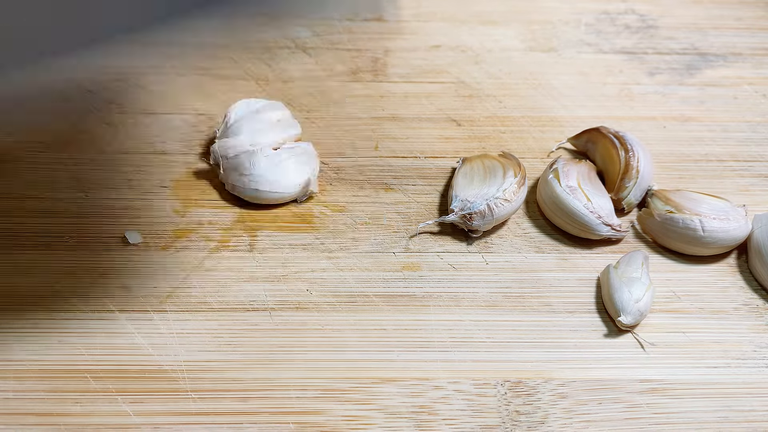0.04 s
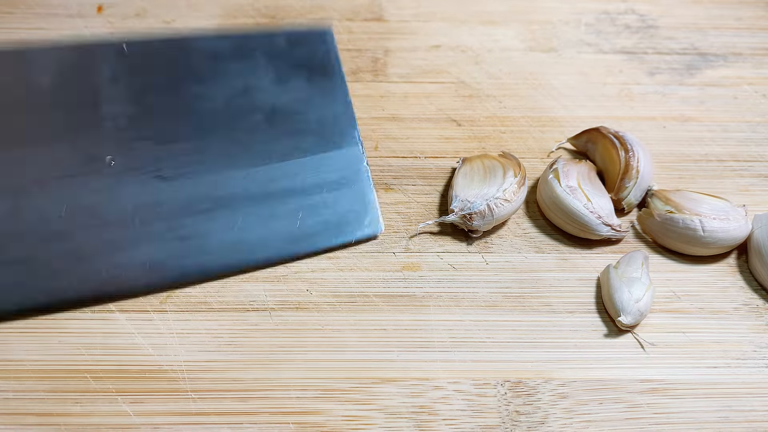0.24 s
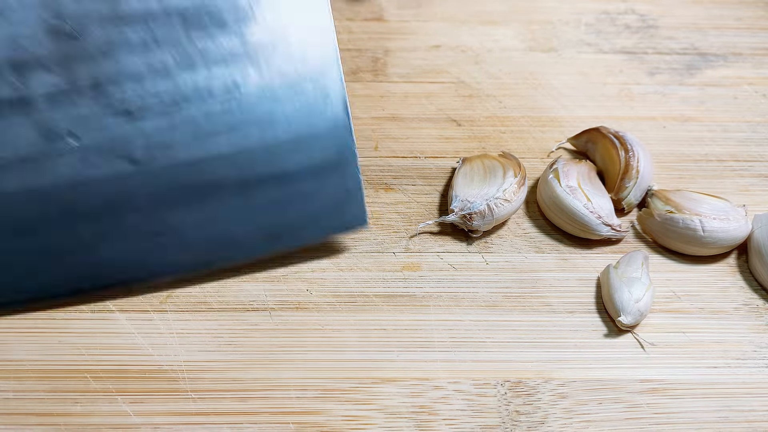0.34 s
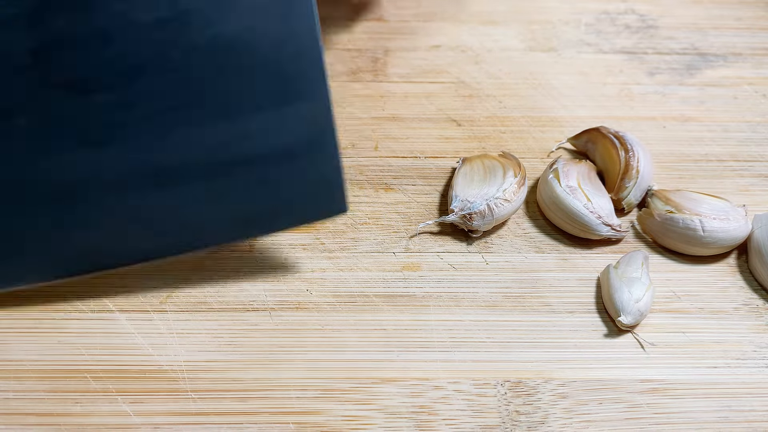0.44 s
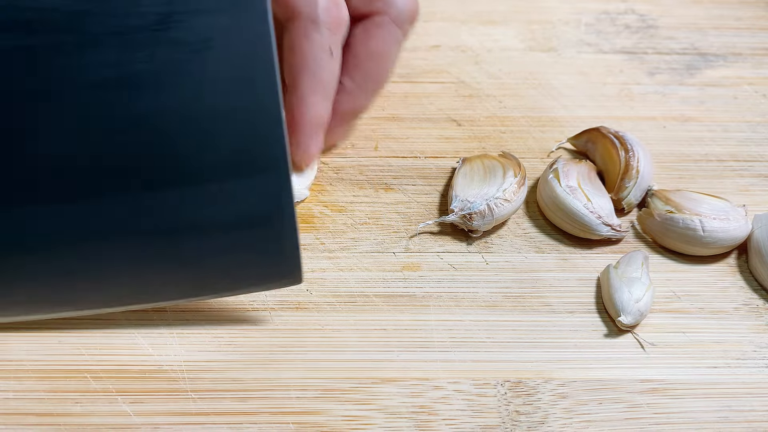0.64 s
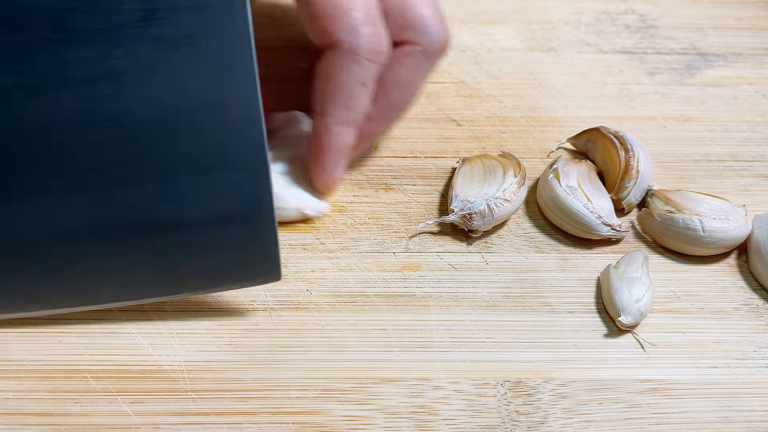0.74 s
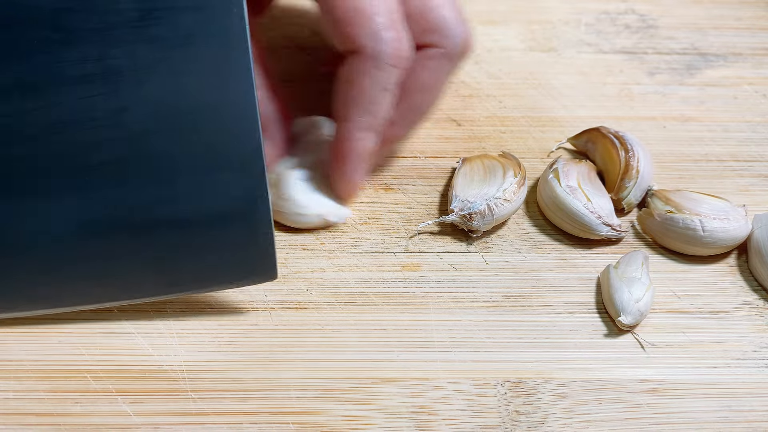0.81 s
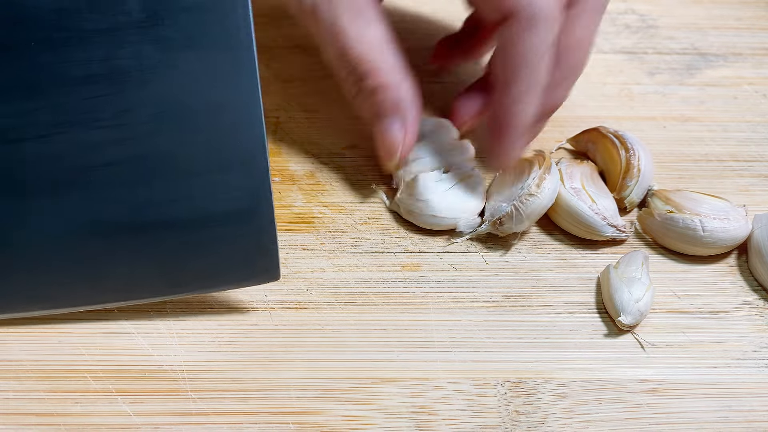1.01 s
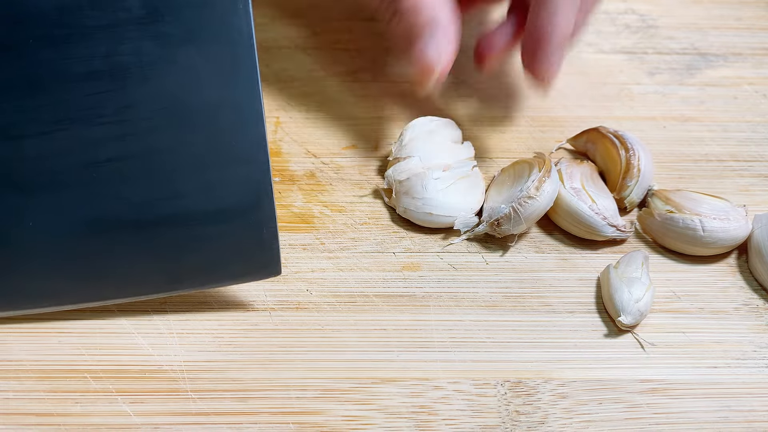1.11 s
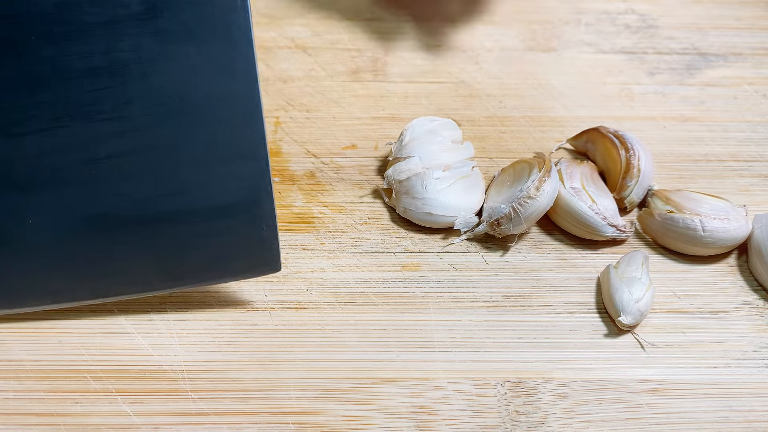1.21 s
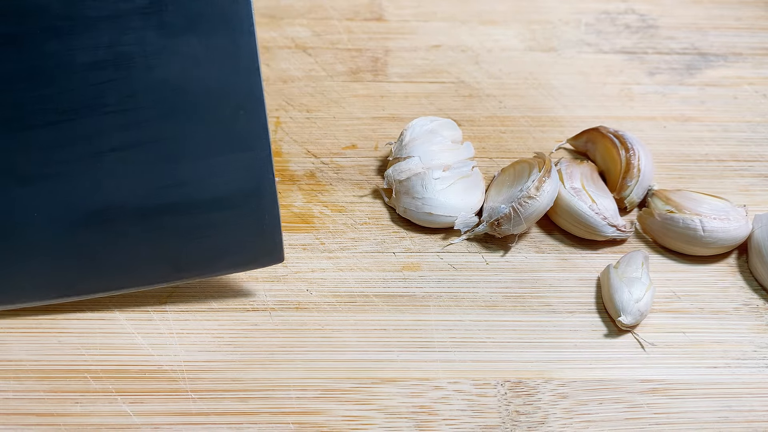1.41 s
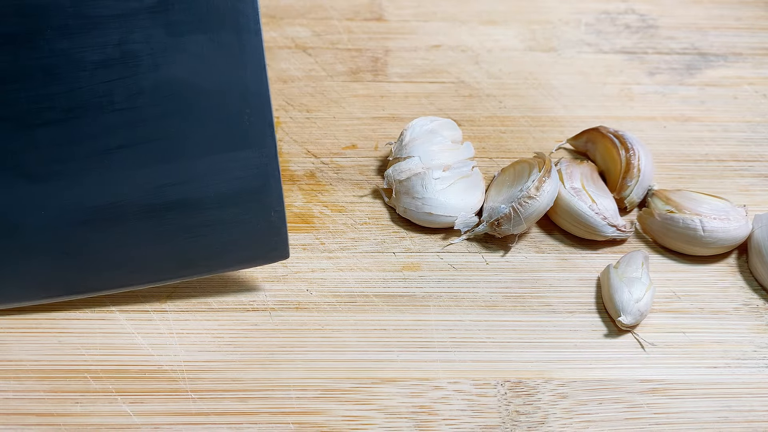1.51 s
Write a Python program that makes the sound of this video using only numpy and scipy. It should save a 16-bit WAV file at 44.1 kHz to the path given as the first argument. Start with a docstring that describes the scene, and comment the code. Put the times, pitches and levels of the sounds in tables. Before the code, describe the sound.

A heavy steel blade smacks flat onto garlic on wood, then knocks softly and faint rubbing follows

```python
"""The flat of a cleaver smacks a garlic clove on a wooden board, rocks down twice more and is drawn aside. Each
contact is a noise crack, damped modes of steel and wood, and a clatter; a resonant noise swells into the smack.
The crushed clove slides over the wood as patchy noise with thin whistles; small taps are pitched puffs. The
worktop drones as resonant noise, in a quiet kitchen heard close up by two microphone ports."""
import sys
import numpy as np
from scipy import signal
from scipy.fft import rfft, irfft, next_fast_len
from scipy.io import wavfile
from scipy.ndimage import uniform_filter1d

SR = 44100
rng = np.random.default_rng(int(sys.argv[2]) if len(sys.argv) > 2 else 0)


def digitize_waveform(pressure):
    """Quantize a signal to 16-bit integers and store it at the path in sys.argv[1].

    Rows of a 2-D input are taken as channels; values are limited to [-1, 1].
    """
    field = np.atleast_2d(pressure).T
    bounded = np.clip(field, -1, 1)
    quanta = np.round(bounded * 32767).astype(np.int16)
    wavfile.write(sys.argv[1], SR, quanta)


N = 68355
T = np.arange(N) / SR  # time [s]

# Kitchen hush: (frequency [Hz], density [dB per Hz])
HUSH_SPECTRUM = [(15, -58.5), (25, -34), (53, -0.5), (123, -4.5), (263, -34.5), (301, -5), (354, -33.5),
                 (394, -28.5), (1650, -24), (1840, -35), (16000, -62.5)]
# Likeness of the two ports in hush and drone: (frequency [Hz], correlation [-1 to 1])
PORT_LIKENESS = [(60, 0.95), (240, 0.82), (950, -0.018), (3770, -0.11), (15000, 0.018)]
# Worktop drone before and after the smack: (time [s], low level [dB], upper level [dB])
DRONE_LEVELS = [
    [(0.0, -38, -47.5), (0.012, -43, -43.5), (0.034, -42.5, -57), (0.062, -46.5, -49.5),
     (0.078, -83.5, -53), (0.1, -50, -47.5)],
    [(0.18, -40, -29.5), (0.266, -51, -41), (0.34, -39, -41.5), (0.374, -34, -45), (0.462, -56.5, -46.5),
     (0.542, -57, -56.5), (0.63, -49, -61.5), (0.736, -61, -65), (0.92, -59, -63.5), (1.194, -71.5, -74),
     (1.55, -70, -68)],
]
# Low and upper worktop resonances: (frequency [Hz], width [Hz], level [dB])
WORKTOP_LOW_MODES = [(68.5, 7.5, -8), (124, 9.9, 2.14)]
WORKTOP_UPPER_MODES = [(204.7, 30, 4.5), (257, 91, -7.5), (430, 60, -11.5), (580, 17, -18)]

# Contacts of the smack, then of the rocking blade:
# (time [s], crack level [dB], steel level [dB], wood level [dB], clatter level [dB])
SMACK_CONTACTS = [(.1250, -16, -30, -34, -45), (.1263, -7, -12, -26, -40), (.1272, -11, -24, -26, -40),
                  (.1291, -26, -30, -5, -29)]
ROCK_CONTACTS = [(.3099, -36.5, -32, -48, -43.5), (.3118, -37, -50.5, -14, -40),
                 (.3263, -35.5, -44.5, -18, -43.5)]
# Modes of the blade, of the board smacked and of the board knocked by the rocking blade:
# (frequency [Hz], level [dB], decay by 60 dB [s], left over right [dB])
STEEL_MODES = [(715, -14, .07, 0), (860, -14, .08, 0), (1044, -17, .15, 0), (1480, -2, .025, 0),
               (1890, -2, .13, 3), (2164, -18, .15, 0), (2358, -19, .25, 0), (2480, -12, .04, 0),
               (2640, -12, .16, 3), (2900, -3, .016, 0), (3330, -22, .25, 0), (3460, -16, .14, 0),
               (3560, 7, .011, 0), (4400, -14, .02, 0), (6000, -14, .03, 0), (7320, -24, .08, 0)]
BOARD_MODES = [(222, -1, .06, -1.5), (68, -26, .15, -1.5), (340, -6, .02, 0), (900, -20, .015, 0),
               (490, -10, .025, -4), (126, -17, .2, -1.5), (680, -18, .015, 0)]
KNOCK_MODES = [(125, -18, .15, 0), (425, -15, .07, 0), (620, -17, .03, 0), (830, -14, .03, 0),
               (1400, 0, .013, 0), (1620, -4, .013, 0), (1870, -14, .06, 0), (2300, -13, .015, 0),
               (2710, -18, .08, 0), (2870, -8, .01, 0), (4050, -18, .01, 0)]
# Crack of a contact: (frequency [Hz], density [dB per Hz])
CRACK_SPECTRUM = [(150, -39.5), (400, -21), (1400, 7), (2500, 7), (3600, 6), (4200, -4), (7500, -1),
                  (10000, -11), (13000, -8), (16000, -12)]
# Dense clatter of board and blade after a contact: (frequency [Hz], density [dB per Hz])
CLATTER_SPECTRUM = [(180, -36.5), (300, -9), (455, -1.5), (634, -11.5), (961, -5), (1320, -11.5),
                    (1840, -6), (3400, -15.5), (7950, -24.5), (8790, -72), (10900, -41.5), (12500, -30),
                    (16000, -80.5)]
# Resonances of the swell that leads into the smack: (frequency [Hz], width [Hz], level [dB])
LEAD_IN_MODES = [(1850, 83, 8), (2600, 200, 7), (3970, 800, -8), (6000, 670, -9.5)]

# Each port's own share of room and clatter: (frequency [Hz], own over shared [ratio])
OWN_SHARE = [(100, .3), (500, 2.1), (3000, 11), (7000, 6.3), (8500, 0.23), (16000, 0.13)]
# Decay of the room: (frequency [Hz], decay by 60 dB [s])
ROOM_DECAY = [(100, 0.55), (300, 0.071), (1000, 0.38), (3000, 0.45), (8000, 0.29), (14000, 0.043)]
# Colour of the room: (frequency [Hz], level [dB])
ROOM_COLOUR = [(100, -17.5), (300, -1.5), (1000, -1.1), (2500, -3), (5000, -3.5), (8000, 5.5),
               (12000, -3.5), (16000, -15.5)]

# Strokes of steel, clove and finger, before RUB_DB: (time [s], level [dB])
STROKES = [
    [(0.34, -64.5), (0.384, -66.5), (0.444, -65), (0.472, -85), (0.55, -86.5), (0.62, -94)],
    [(0.62, -85.5), (0.742, -62), (0.872, -61.5), (0.94, -66), (0.964, -61), (1.038, -63), (1.055, -61.5),
     (1.075, -81), (1.168, -108), (1.2, -95.5)],
    [(1.45, -97.5), (1.455, -77.5), (1.492, -85), (1.532, -76.5), (1.542, -66), (1.55, -90)],
]
# Friction on wood: (frequency [Hz], density [dB per Hz])
RUB_SPECTRUM = [(200, -18.5), (600, -14.5), (1100, -4.5), (1700, -10.5), (2250, -1.5), (2600, 1),
                (3000, -4), (4000, -6), (7000, -1.5), (10000, -0.5), (13000, -4), (15000, 5.5),
                (16000, -12.5)]
# Thin whistles while the steel drags, and a faint later one:
# (middle [s], half length [s], pitch [Hz], width [Hz], level [dB])
WHISTLES = [(.42, .05, 5150, 120, -66), (.43, .05, 6300, 100, -66), (.44, .04, 7350, 25, -61),
            (1.255, .05, 5550, 250, -85)]
# Fingers and skin ticking, far taps: (time [s], peak level [dB], pitch [Hz], decay by 60 dB [s])
TAPS = [(.388, -40, 560, .04), (.655, -62, 3000, .008), (.6875, -51, 9000, .004), (.706, -54, 7000, .008),
        (.735, -45, 5000, .01), (.781, -46, 11000, .004), (.824, -58, 1050, .03), (.835, -55, 2600, .03),
        (.856, -59, 600, .025), (.858, -58, 2700, .015), (.872, -58, 1050, .02), (.893, -59, 1250, .015),
        (.922, -56, 700, .03), (.948, -59, 1150, .02), (.962, -55, 2600, .03), (1.001, -53, 3500, .01),
        (1.044, -57, 1300, .025), (1.046, -56, 6000, .015), (1.4535, -54, 1500, .006),
        (1.4575, -50, 800, .015), (1.458, -57, 3300, .05), (1.5135, -57, 850, .015)]
# Phase between the microphone ports: (frequency [Hz], left lead [radians])
PORT_LEAD = [(300, 0.05), (700, -1.4), (1300, -.9), (2000, -2.1), (2800, -1.9), (4500, -1.3), (6500, -.4),
             (8400, 3.1), (10100, 3.2), (11000, 6.3), (13600, 6.4), (14500, 9.4), (16000, 9.4)]

AIR_DB = -63
EARLIER_DB, EARLIER_T60 = -71.5, .34  # level at the start, decay by 60 dB [s]
CRACK_T60 = .0055  # s
ATTACK_S = .00011  # onset of every mode
STEEL_SCATTER_DB, WOOD_SCATTER_DB = 1.5, .7  # random spread of mode levels
CLATTER_T60, CLATTER_RISE_S = .25, .0013  # s
LEAD_START_S, LEAD_END_S, LEAD_RISE_S = .105, .1255, .01  # swell starts, swell ends, rise time of the swell
LEAD_DB, LEAD_PAN_DB = -19, 11  # left level, left over right
SLAP_S, SLAP_LEN_S, SLAP_DB = .1287, .0003, -6
ROOM_DB = -13  # gain of the room's answer
GRAINS_PER_S, GRAIN_SPREAD_DB = 700, 4
PATCHY_DB, RUB_DB = 2.8, 3  # unevenness of the hiss, gain over the strokes
TAP_WIDTH = .35  # resonance width over pitch
MIC_LOW_HZ, TOP_HZ = 30, 16200  # bass corner, band limit


def amp(db):
    """dB to gain."""
    return 10 ** (np.asarray(db) / 20)


def unit(x):
    """Scaled to rms 1."""
    return x / np.sqrt(np.mean(x ** 2) + 1e-20)


def along(points, hz):
    """Values of a (Hz, value) table, read along a log frequency axis."""
    f, value = np.transpose(points)
    return np.interp(np.log(hz + 1), np.log(f + 1), value)


def filtered(x, response):
    """x times a complex response of frequency."""
    m = next_fast_len(N + SR // 2)
    return irfft(rfft(x, m) * response(np.fft.rfftfreq(m, 1 / SR)), m)[..., :N]


def peaks(table):
    """Response of a set of resonances of alternating sign."""
    def response(f):
        return sum((-1) ** k * amp(db) * 1j * f * width / (c * c - f * f + 1j * f * width)
                   for k, (c, width, db) in enumerate(table))
    return response


def spread(response):
    """Stereo noise of rms 1, alike in the bass: mid and side shares set the likeness."""
    def shares(hz):
        turn = np.arccos(np.clip(along(PORT_LIKENESS, hz), -1, 1)) / 2
        return response(hz) * [np.cos(turn), np.sin(turn)]
    mid, side = filtered(rng.standard_normal((2, N)), shares)
    return unit(np.array([mid + side, mid - side]))


def ring(modes, t, scatter_db):
    """Damped modes of alternating sign, a slightly new balance for each contact."""
    total = 0
    for k, (hz, db, t60, pan) in enumerate(modes):
        port_db = np.array([[pan], [-pan]]) / 2
        level_db = db + scatter_db * rng.standard_normal() + port_db - 60 * t / t60
        total = total + (-1) ** k * amp(level_db) * np.sin(2 * np.pi * hz * t)
    return (1 - np.exp(-t / ATTACK_S)) * total


def air():
    """Kitchen hush as steady shaped noise, and the dying tail of an earlier blow."""
    hush = amp(AIR_DB) * spread(lambda hz: amp(along(HUSH_SPECTRUM, hz)))
    earlier = spread(lambda hz: amp(along(CRACK_SPECTRUM, hz)))
    return hush + amp(EARLIER_DB - 60 * T / EARLIER_T60) * earlier


def drone():
    """The worktop trembles: noise through its low and upper resonances, each with its own level curve."""
    s, low_db, upper_db = np.vstack(DRONE_LEVELS).T
    low = amp(np.interp(T, s, low_db)) * spread(peaks(WORKTOP_LOW_MODES))
    upper = amp(np.interp(T, s, upper_db)) * spread(peaks(WORKTOP_UPPER_MODES))
    return low + upper


def clatter_noise():
    """Dense clatter as noise, partly shared and partly each port's own."""
    def tone(hz):
        return amp(along(CLATTER_SPECTRUM, hz)) / np.sqrt(1 + along(OWN_SHARE, hz) ** 2)
    shared = filtered(rng.standard_normal(N), tone)
    own = filtered(rng.standard_normal((2, N)), lambda hz: tone(hz) * along(OWN_SHARE, hz))
    return unit(shared + own)


def lead_in():
    """A resonant noise swells and leads into the smack, stopping just before it."""
    swell = np.exp(np.minimum(T - LEAD_END_S, 0) / LEAD_RISE_S) * (T < LEAD_END_S) * (T > LEAD_START_S)
    lead_noise = unit(filtered(rng.standard_normal(N), peaks(LEAD_IN_MODES))) * swell
    return lead_noise * amp(LEAD_DB + np.array([[0], [-LEAD_PAN_DB]]))


def slap():
    """Air squeezed from under the blade gives one smooth pressure pulse."""
    return amp(SLAP_DB) * np.exp(-((T - SLAP_S) / SLAP_LEN_S) ** 2)


def cleaver():
    """Each contact cracks, rings the steel, sounds the wood and leaves a clatter."""
    out, t = np.zeros((2, 2 * N)), T[:SR // 2]
    crack_noise = unit(filtered(rng.standard_normal(N), lambda hz: amp(along(CRACK_SPECTRUM, hz))))
    clatter = clatter_noise()
    clatter_shape = amp(-60 * t / CLATTER_T60) * (1 - np.exp(-t / CLATTER_RISE_S))
    for contacts, wood_modes in ((SMACK_CONTACTS, BOARD_MODES), (ROCK_CONTACTS, KNOCK_MODES)):
        for s, crack_db, steel_db, wood_db, clatter_db in contacts:
            i = round(s * SR)
            span = slice(i, i + len(t))
            out[:, span] += amp(crack_db - 60 * t / CRACK_T60) * crack_noise[span]
            out[:, span] += amp(steel_db) * ring(STEEL_MODES, t, STEEL_SCATTER_DB)
            out[:, span] += amp(clatter_db) * clatter_shape * clatter[:, span]
            out[:, span] -= amp(wood_db) * ring(wood_modes, t, WOOD_SCATTER_DB)
    return out[:, :N]


def room(x):
    """Each frequency of the kitchen's answer dies at its own speed; part differs from port to port."""
    hz, t, z = signal.stft(rng.standard_normal((3, SR)), SR, nperseg=256)
    own = along(OWN_SHARE, hz)[:, None]
    z = (z[:1] + own * z[1:]) / np.sqrt(1 + own ** 2)
    decay = amp(-60 * t / along(ROOM_DECAY, hz)[:, None])
    tail = signal.istft(z * decay, SR, nperseg=256)[1]
    delayed = np.pad(x, ((0, 0), (130, 0)))  # samples, about 3 ms
    wet = signal.fftconvolve(delayed, tail / np.linalg.norm(tail[0]), axes=1)[:, :N]
    return filtered(wet, lambda hz: amp(along(ROOM_COLOUR, hz)))


def rub():
    """Friction on wood: hiss with papery grains, made patchy over time and frequency, under the strokes."""
    grains = (rng.random(N) < GRAINS_PER_S / SR) * amp(GRAIN_SPREAD_DB * rng.standard_normal(N))
    grains = grains * np.sign(rng.standard_normal(N))
    z = signal.stft(unit(grains) * .22 + rng.standard_normal(N), nperseg=256)[2]
    patches = uniform_filter1d(rng.standard_normal(z.shape), size=5, axis=0)
    patches = uniform_filter1d(patches, size=8, axis=1)
    hiss = signal.istft(z * amp(PATCHY_DB * unit(patches)), nperseg=256)[1][:N]
    hiss = unit(filtered(hiss, lambda hz: amp(along(RUB_SPECTRUM, hz))))
    level = sum(amp(np.interp(T, *np.transpose(rows), left=-120, right=-120)) for rows in STROKES)
    return amp(RUB_DB) * level * hiss


def whistles():
    """Thin whistles: narrow resonant noise swelling and fading, weaker and inverted on the right."""
    out = np.zeros(N)
    for s, half, hz, width, db in WHISTLES:
        tone = unit(filtered(rng.standard_normal(N), peaks([(hz, width, 0)])))
        out += amp(db) * tone * np.exp(-((T - s) / half) ** 2)
    return out * np.array([[1], [-.3]])


def taps():
    """Short decaying noise puffs, each through a broad resonance at its pitch."""
    out, t = np.zeros(2 * N), T[:SR // 20]
    for s, db, hz, t60 in TAPS:
        burst = amp(-60 * t / t60) * rng.standard_normal(len(t))
        resonance = peaks([(hz, TAP_WIDTH * hz, 0)])
        puff = filtered(burst, lambda f: resonance(f) ** 2)[:len(t)]
        out[round(s * SR):][:len(t)] += amp(db) * puff / np.abs(puff).max()
    return out[:N]


def scene():
    """The two ports hear the board and its room answer with a phase turn between them."""
    near = cleaver() + slap() + lead_in() + taps() + rub() + whistles()

    def lead(hz):
        return np.exp(.5j * along(PORT_LEAD, hz) * np.array([[1], [-1]]))
    return filtered(near + amp(ROOM_DB) * room(near), lead) + drone() + air()


def record(dry):
    """The microphone loses the deepest bass; nothing is kept above the band limit."""
    return filtered(dry, lambda hz: (hz < TOP_HZ) * 1j * hz / (MIC_LOW_HZ + 1j * hz))


dry = scene()
out = record(dry)
digitize_waveform(out)
```